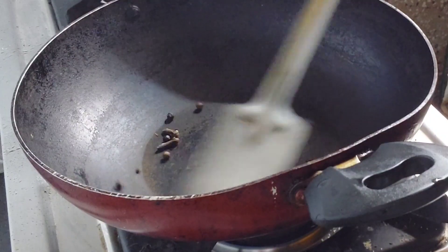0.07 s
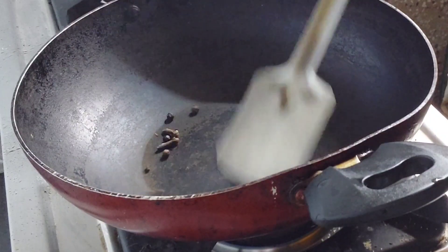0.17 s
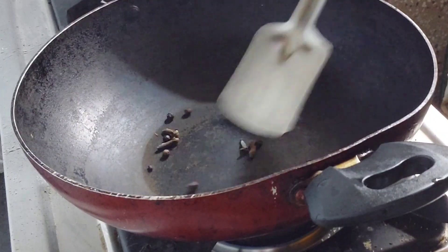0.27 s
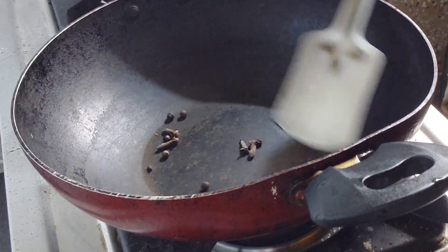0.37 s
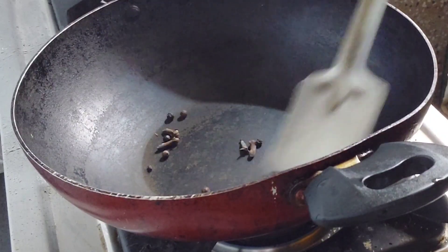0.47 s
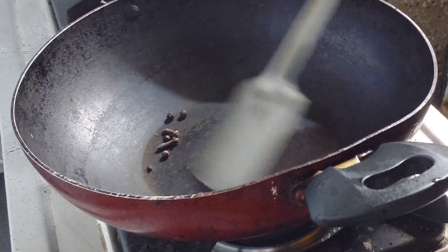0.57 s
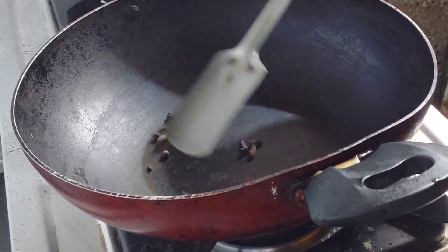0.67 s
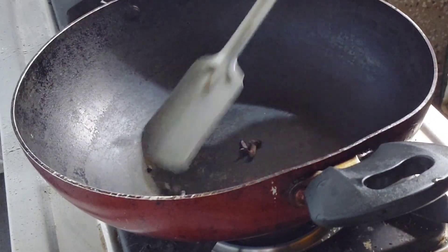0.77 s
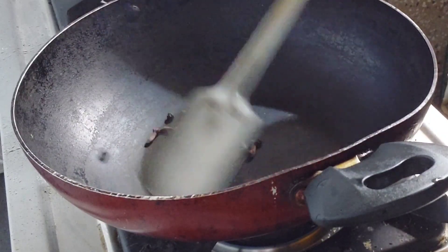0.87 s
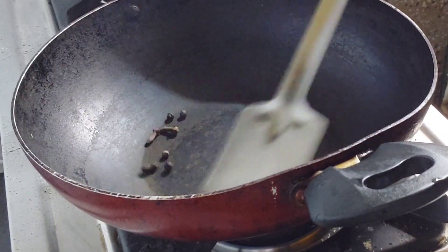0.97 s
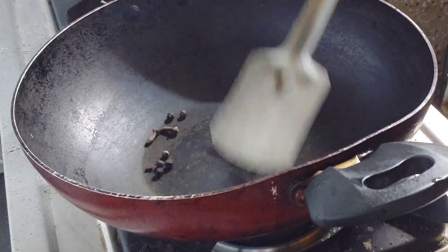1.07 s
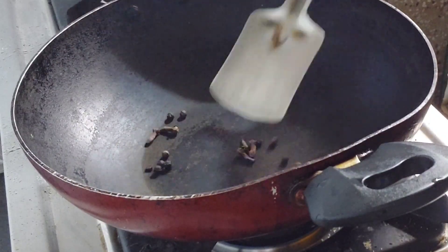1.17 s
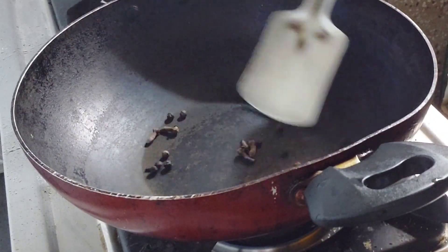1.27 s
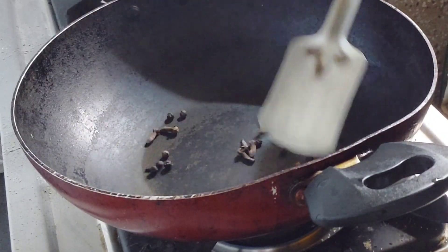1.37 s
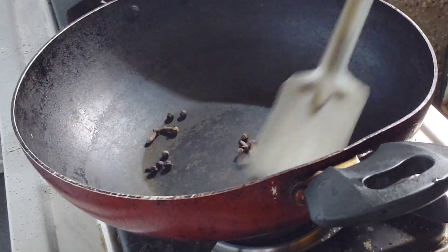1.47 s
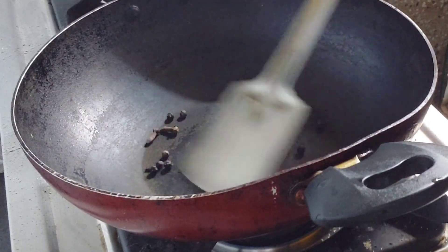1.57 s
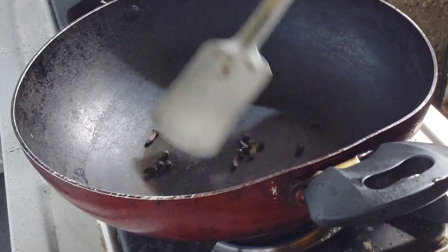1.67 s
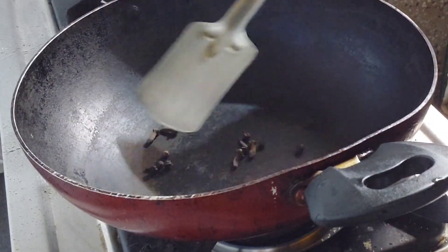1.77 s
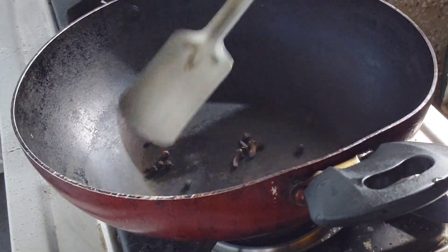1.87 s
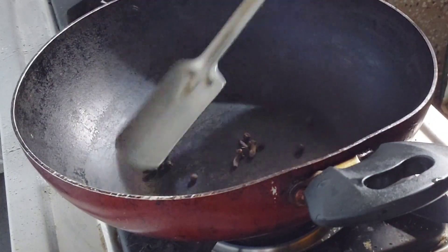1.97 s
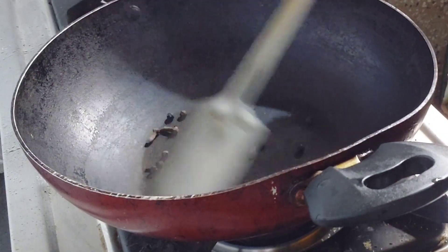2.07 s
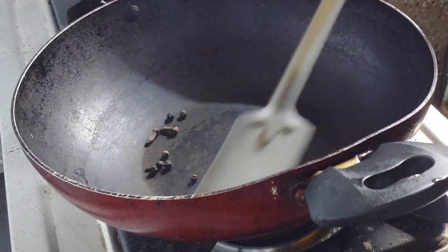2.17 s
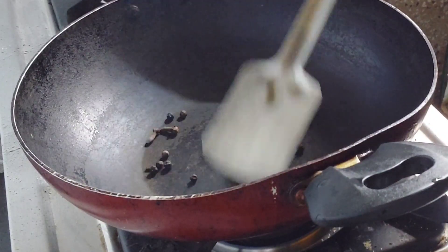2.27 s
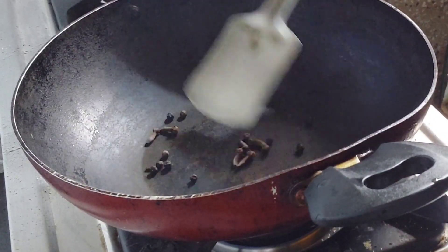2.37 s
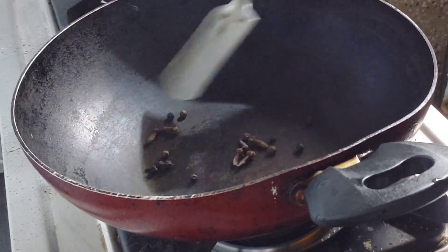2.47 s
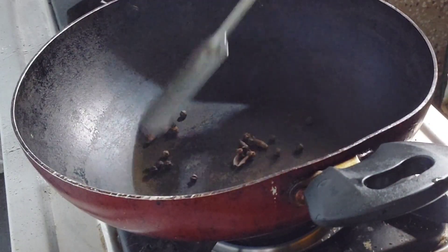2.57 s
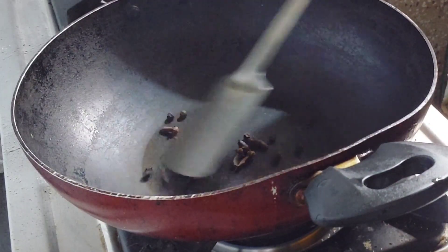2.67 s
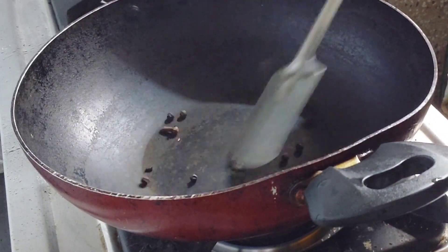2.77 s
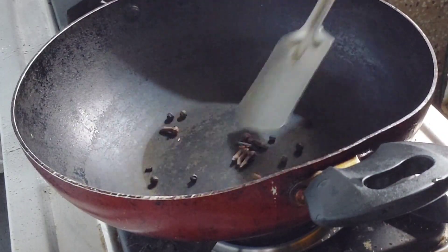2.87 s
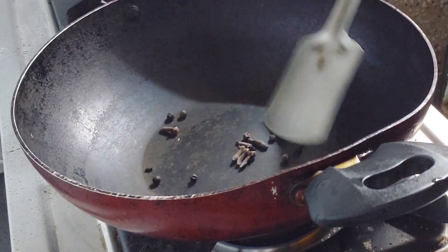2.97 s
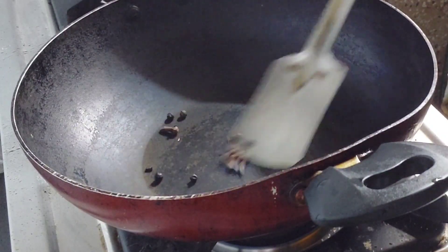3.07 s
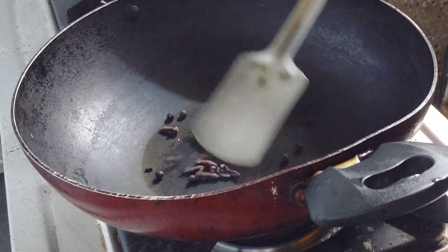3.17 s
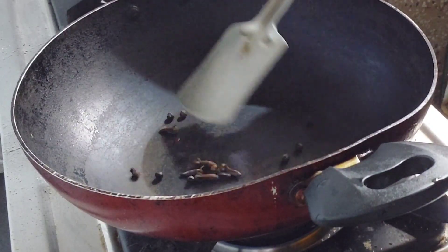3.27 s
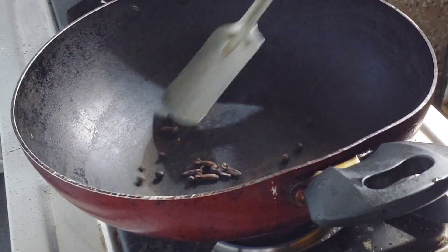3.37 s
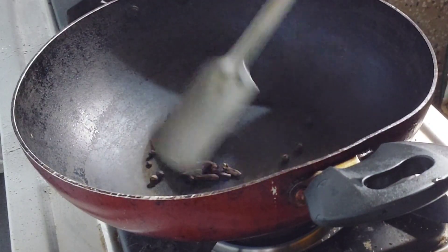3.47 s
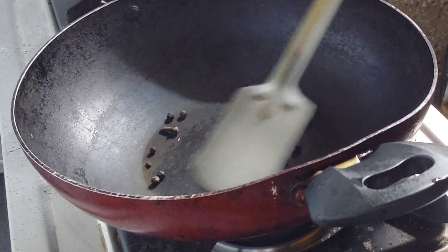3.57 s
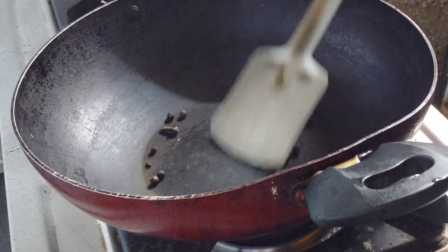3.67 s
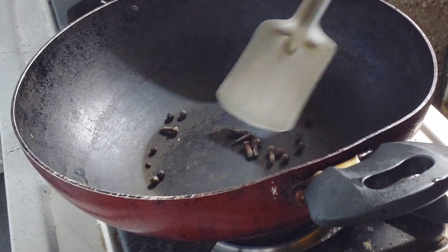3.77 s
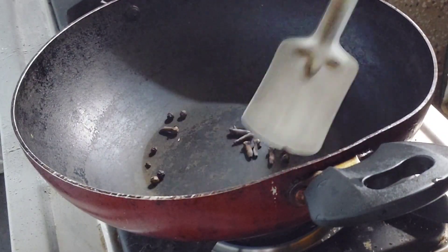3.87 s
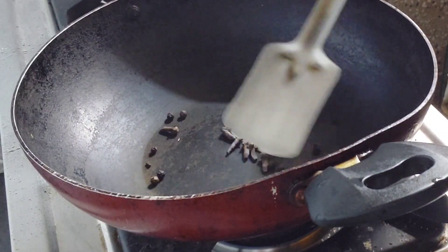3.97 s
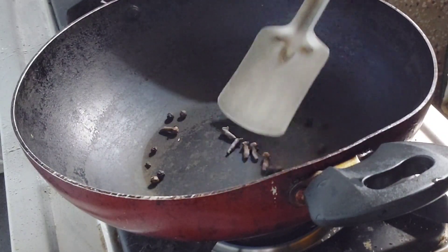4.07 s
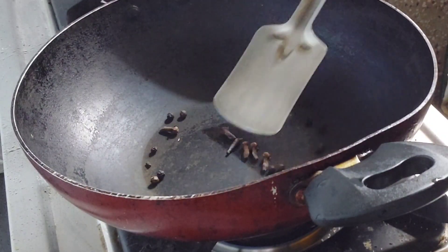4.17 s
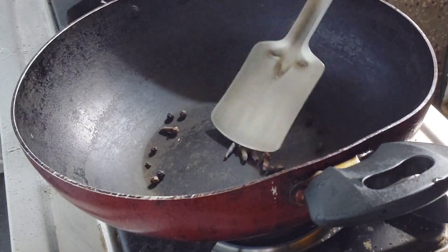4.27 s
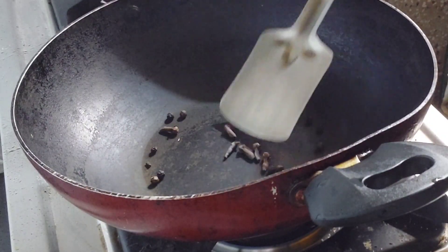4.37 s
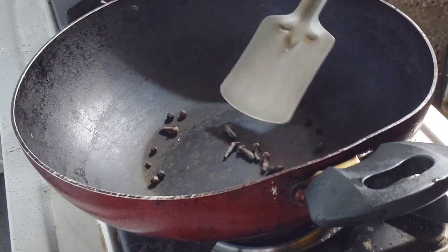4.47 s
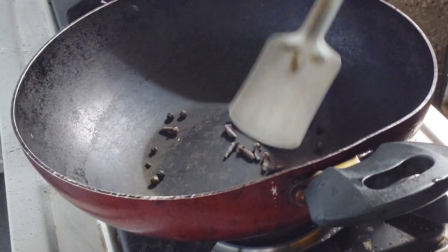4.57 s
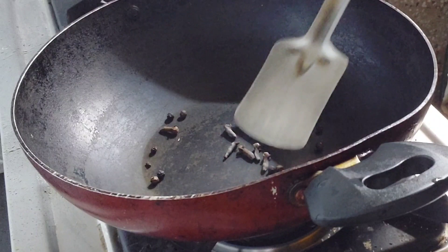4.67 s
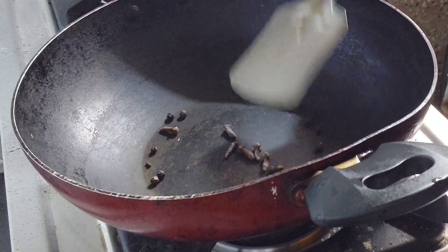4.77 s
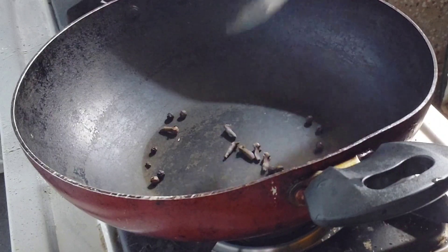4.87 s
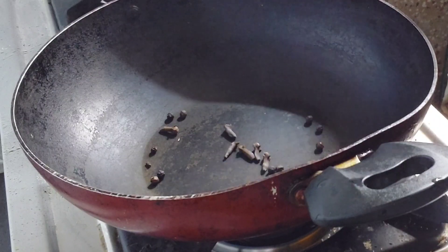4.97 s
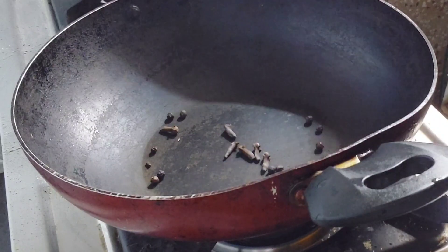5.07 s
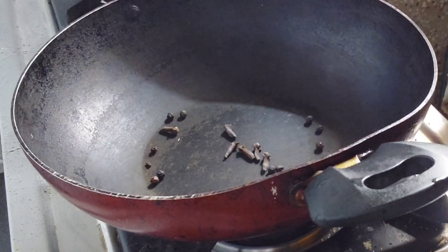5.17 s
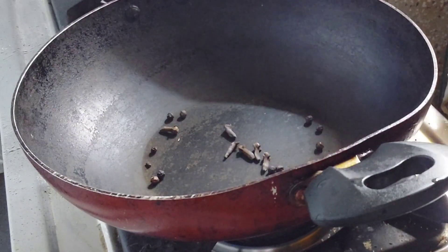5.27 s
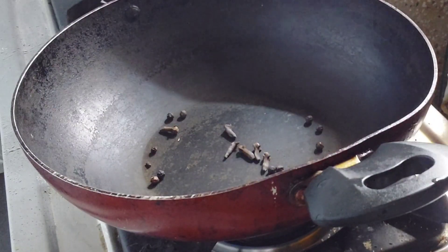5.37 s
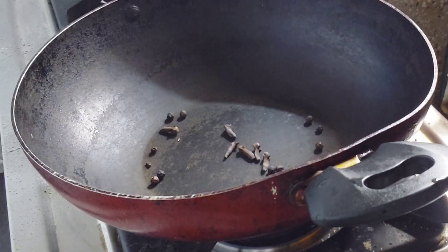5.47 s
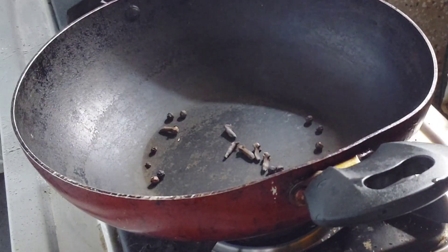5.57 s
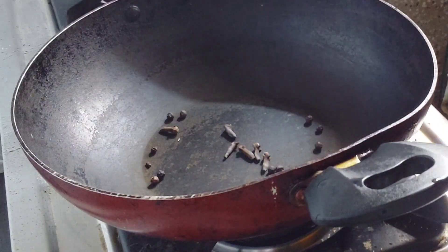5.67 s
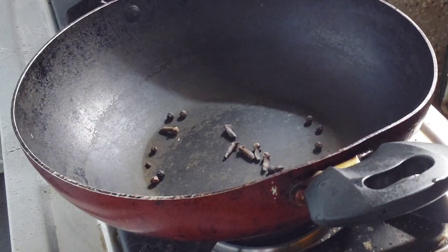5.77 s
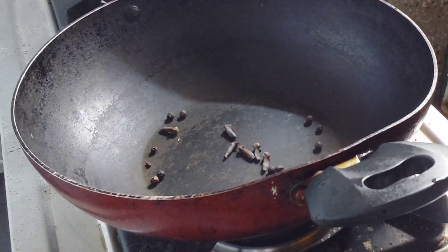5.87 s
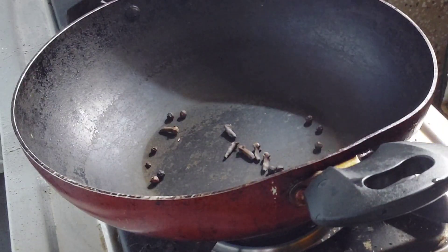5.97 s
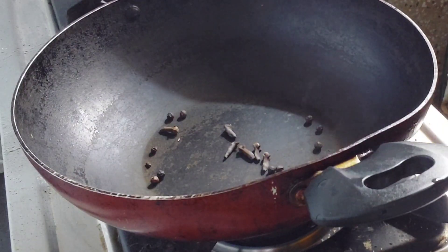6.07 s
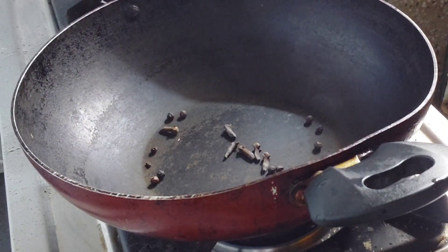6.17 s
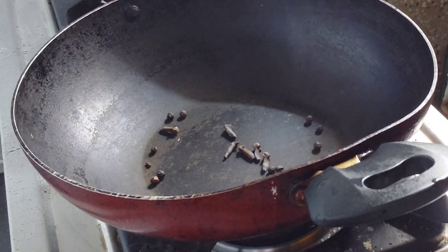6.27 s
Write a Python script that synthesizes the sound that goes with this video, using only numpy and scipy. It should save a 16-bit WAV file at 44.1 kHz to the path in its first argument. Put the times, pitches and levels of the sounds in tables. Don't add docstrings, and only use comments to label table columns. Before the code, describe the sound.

Close stereo sound in a small, quiet kitchen at night. From 0 s a wooden spatula knocks into a thin coated pan and drags whole spices across it with dry, gritty, stick-slip scrapes. Landings come at about 0.0, 0.4, 0.9, 1.4, 2.0, 2.6, 3.1, 3.5, 3.9, 4.3 and 4.7 s; those at 3.1 and 3.9 are sharpest and loudest, while 4.3 is barely a touch. Small spice ticks fall between, notably around 1.1 and 1.6 s. A strong scrape bursts near 2.75 s, leaving a thin high rim ring. Each blow gives a short hollow metallic clank around one kilohertz and a soft low thud from stand and counter. After 4.8 s the stirring stops; only faint low bumps remain until about 6.3 s, over soft night air, a distant throbbing cricket hiss and very high, short katydid rasps that run throughout.

```python
import sys
import numpy as np
from scipy import signal
from scipy.fft import rfft, irfft, next_fast_len
from scipy.io import wavfile

SR = 44100
rng = np.random.default_rng(int(sys.argv[2]) if len(sys.argv) > 2 else 0)


def wav_out(sig):
    wavfile.write(sys.argv[1], SR, np.round(np.clip(np.atleast_2d(sig).T, -1, 1) * 32767).astype(np.int16))


def amplitude_ratio(level_db):
    exponent = np.asarray(level_db, float) / 20
    return 10 ** exponent


N = 279064

# low_hz, high_hz
ZONES_HZ = [(3500, 7500), (330, 750), (750, 1300), (1300, 3500), (7500, 16500)]
# start_s, wall_peak_db, then relative to the wall wood_db, floor_db, side_db
LANDINGS = [(0.0146, -14, -9, -10, -16), (0.4254, -12.5, -18, -4, -9.5), (0.8665, -15.5, -7.5, -5.5, -15.5),
            (1.3823, -14, -16, 3.5, -6.5), (1.9787, -23.5, 1, -0.5, -11), (2.644, -22.5, -2, 3, -10.5),
            (3.0597, -5, -18.5, 0.5, -13.5), (3.5101, -26, -5, -2.5, -14.5), (3.941, -5, -15.5, -1.5, -11),
            (4.3241, -43, -15, 8.5, -36), (4.6654, -18.5, -14.5, 3, -6.5)]
# hz, likeness (0-1)
LIKENESS = [(28, .4), (60, .92), (300, .85), (640, .5), (1400, .05), (15000, .03)]


def rms_one(x):
    return x / np.sqrt(np.mean(x ** 2) + 1e-20)


def at_hz(points, hz):
    points_hz, values = np.transpose(points)
    return np.interp(np.log(hz), np.log(points_hz), values)


def band(x, low_hz, high_hz, order=2):
    sos = signal.butter(order, [low_hz, high_hz], "band", fs=SR, output="sos")
    return signal.sosfilt(sos, x)


def resonance(x, hz, width_hz):
    r = np.exp(-np.pi * width_hz / SR)
    zeros = np.array([1, 0, -1]) * (1 - r * r) / 2
    poles = [1, -2 * r * np.cos(2 * np.pi * hz / SR), r * r]
    return signal.lfilter(zeros, poles, x)


def shape(x, peaks):
    for hz, width_hz, lift_db in peaks:
        x = x + (amplitude_ratio(lift_db) - 1) * resonance(x, hz, width_hz)
    return x


def drift(knots_per_s):
    knots = rng.standard_normal(int(N / SR * 200))
    return np.interp(np.arange(N) / SR * knots_per_s, np.arange(len(knots)), knots)


def banded_noise(size, gain):
    out = 0
    edges_hz = 25 * 2 ** (np.arange(29) / 3)
    white = rng.standard_normal((2, 2, size))
    for k, (low_hz, high_hz) in enumerate(zip(edges_hz, edges_hz[1:])):
        mid, side = band(white[k % 2], low_hz, high_hz)
        hz = np.sqrt(low_hz * high_hz)
        alike = np.clip(at_hz(LIKENESS, hz), -1, 1)
        pair = np.sqrt(1 + alike) * mid + np.sqrt(1 - alike) * side * [[1], [-1]]
        out = out + gain(hz) * pair
    return out


def pan():
    zone_right_db = [-2.5, 3, 2, 2, -2]
    force = friction() + knocks()
    place = 1.3 * drift(14)
    out, size = 0, next_fast_len(N + SR // 2)
    for share in (np.cos(place), np.sin(place)):
        response = pan_response()
        for zone, (low_hz, high_hz), right_db in zip(force, ZONES_HZ, zone_right_db):
            part = band(response, low_hz, high_hz, order=3)
            energy = np.sum(part ** 2, axis=1, keepdims=True)
            part = part / np.sqrt(energy) * amplitude_ratio([[0], [right_db]])
            out = out + rfft(share * zone, size) * rfft(part, size)
    return irfft(out, size)[:, :N]


def pan_response(modes_db=-0.5, room_db=-11.5, port_lag_s=0.0002):
    # hz, level_db, t60_s
    modes_table = [(465, -7, .13), (558, -9, .13), (660, -14, .2), (793, -8, .13), (867, -6, .16),
                   (830, -11, .13), (955, 0, .12), (982, -1, .14), (1068, -4, .13), (1090, -8, .2),
                   (976, -19, .45), (1255, -13, .13), (1555, -8, .14), (1600, -6, .15), (1740, -12, .14),
                   (2010, -11, .16), (2420, -13, .15), (2880, -13, .13), (988, -17, .5), (4409, -14, .12),
                   (4920, -14, .12), (5098, -15, .14), (5490, -15, .16), (5970, -16, .16), (6178, -14, .16),
                   (6331, -18, .16), (7800, -22, .1), (11400, -23, .1), (12150, -24, .1), (15000, -25, .1)]
    # hz, db_per_hz
    shell_db = [(190, -37), (330, -6), (382, -31), (472, -6), (731, -20.5), (964, -15), (1400, -26),
                (1620, -17), (3530, -16), (3710, -16.5), (5130, -14), (6240, -8.5), (8360, -35.5),
                (11800, -7), (16000, -14.5)]
    # hz, t60_s
    shell_t60 = [(330, 0.4), (1000, 0.18), (4000, 0.07), (16000, 0.06)]
    # hz, t60_s
    kitchen_t60 = [(330, 0.17), (1000, 0.44), (4000, 0.41), (16000, 0.1)]
    # hz, width_hz, lift_db
    crowds = [(728, 450, -27), (996, 38, 15.5), (1308.1, 950, 2.5), (1570, 190, 5), (2606, 70, 1.5),
              (3407, 380, -18.5), (4280, 68, -7.5), (5457, 1500, -7), (10174, 2300, -1)]

    t = np.arange(SR // 2) / SR
    swell = 1 - np.exp(-t / 0.00037)
    room_gain = amplitude_ratio(room_db) * (1 - np.exp(-t / 0.0027))

    def shell_gain(hz):
        direct = amplitude_ratio(-60 * t / at_hz(shell_t60, hz))
        late = room_gain * amplitude_ratio(-60 * t / at_hz(kitchen_t60, hz))
        return amplitude_ratio(at_hz(shell_db, hz)) * (direct + late)

    shell = shape(banded_noise(len(t), shell_gain), crowds)
    modes = 0
    chance = rng.uniform(-1, 1, (len(modes_table), 2))
    for (hz, level_db, t60_s), (facing, reach) in zip(modes_table, chance):
        lead = np.pi * hz * port_lag_s + facing * min(hz / 2000, np.pi / 2)
        fade = amplitude_ratio(level_db + 4 * reach - 60 * t / t60_s)
        modes = modes + fade * np.sin(2 * np.pi * hz * t + lead * np.array([[1], [-1]]))
    return swell * (rms_one(shell) + amplitude_ratio(modes_db) * rms_one(modes))


def friction(grains_per_s=2000, spread_db=5.0):
    sizes_db = spread_db * np.minimum(rng.exponential(1, (5, N)), 4)
    sizes = amplitude_ratio(sizes_db) * rng.choice([-1, 1], (5, N))
    grains = rms_one(sizes * (rng.random((5, N)) < grains_per_s / SR))
    chatter_db = np.array([0.75 * drift(70) + 0.5 * drift(190) for zone in ZONES_HZ])
    return amplitude_ratio(pressure() - 6.0 + chatter_db) * grains


def pressure():
    # touch_s, touch_db, lift_s, lift_db, release_db_per_s
    strokes = [(0.03, -33.5, 0.24, -27, 199), (.44, -35.5, 0.57, -21.5, 119.5),
               (0.552, -16.5, .655, -35.5, 403.5), (.88, -30.5, 1.204, -34.5, 131),
               (1.4, -34.5, 1.59, -29, 182), (1.98, -47.5, 2.16, -36, 87),
               (2.165, -39.5, 2.298, -26.5, 173), (2.66, -33.5, 2.772, -31.5, 120),
               (2.739, -24.5, 2.79, -15.5, 300.5), (3.08, -19, 3.207, -34.5, 166),
               (3.53, -41, 3.59, -31, 149), (3.61, -28.5, 3.733, -34.5, 409),
               (3.799, -68, 3.916, -57.5, 321.5), (3.96, -25, 4.03, -29.5, 188),
               (4.33, -53.5, 4.63, -79, 200), (4.685, -23.5, 4.727, -34, 208),
               (5.39, -84, 5.45, -102.5, 200)]
    # wood_db, floor_db, side_db, grit_db
    places = [(0, -7, -3.5, -2.5), (1, 0.5, 0, -5.5), (-8, 10, 3.5, -19), (4, -3.5, -6.5, -5),
              (5, 3.5, 1, -2.5), (17.5, -5, -4, 0.5), (8.5, 1.5, 0, -1.5), (10, 3.5, -2.5, -11),
              (-12, -6, -5, -7), (-7, 4, -5.5, -5), (3.5, -6, -3, -5), (-3, 2, -5, -3.5),
              (-10, -7, -12, -11), (2, 4.5, -3.5, -9.5), (11, 4, -6.5, -15), (5, 5.5, -3, -11),
              (17, 32, 8, -10)]
    # wood_db, floor_db, side_db, grit_db
    sweep_db = [-9, 4.5, 7, -2.7]
    letting_go_db_per_s = [-8.5, -49, -52.5, -5]
    touch_db_per_s = 798
    skid_db, skid_db_per_s, skid_grit_db = -9.5, 888, -10.5

    step = 8
    t = np.arange(0, N, step) / SR
    out = np.full((len(ZONES_HZ), len(t)), -120.)
    for (touch_s, touch_db, lift_s, lift_db, release_db_per_s), place in zip(strokes, places):
        at = round(touch_s * SR / step)
        since = t[at:] - touch_s
        along = np.clip(since / max(lift_s - touch_s, .01), 0, 1)
        after = np.maximum(t[at:] - lift_s, 0)
        wall_db = touch_db + (lift_db - touch_db) * along - release_db_per_s * after
        wall_db = wall_db + np.minimum(touch_db_per_s * since - 10.5, 0)
        parts_db = np.c_[list(place)] + np.c_[sweep_db] * along + np.c_[letting_go_db_per_s] * after
        push_db = wall_db + np.array([0 * along, *parts_db])
        out[:, at:] = np.maximum(out[:, at:], push_db)
    for start_s, wall_db, *parts_db in LANDINGS:
        at = round(start_s * SR / step)
        fading_db = wall_db + skid_db - skid_db_per_s * (t[at:] - start_s)
        zones_db = fading_db + np.c_[[0, *parts_db, skid_grit_db]]
        out[:, at:] = np.maximum(out[:, at:], zones_db)
    return np.repeat(out, step, axis=1)[:, :N]


def knocks(contact_s=0.0003, gain_db=24, lead_s=0.001, flick_wood_db=-17):
    # start_s, wall_peak_db, then relative floor_db, side_db
    flicks = [(0.386, -37, -8, -8), (0.5406, -37, 8, -10), (0.6377, -37.5, 14, 6), (0.707, -29, -10, -19),
              (0.842, -27, -15, -26), (1.025, -22.5, -36, -2), (1.1201, -20.5, 0, -7.5),
              (1.5608, -32.5, 9, -11), (1.6084, -17, 1.5, -6), (1.8507, -44.5, -11, -26),
              (1.9, -46.5, -15.5, -20), (1.9296, -44.5, -29, -18), (2.246, -22.5, -6.5, -20),
              (3.8425, -39.5, -1.5, -11)]
    zone_lift_db = [-2.5, 3.5, 3, 5, -13]
    size = 400
    force = np.zeros((len(ZONES_HZ), N + size))
    hits = list(LANDINGS)
    for start_s, wall_db, floor_db, side_db in flicks:
        hits.append((start_s, wall_db, flick_wood_db, floor_db, side_db))
    fade = np.exp(-np.arange(size) / SR / contact_s)
    bursts = rng.standard_normal((len(hits), size)) * fade
    power = np.abs(rfft(bursts, 2048)) ** 2
    hz = np.arange(1025) * SR / 2048
    zone_power = [power[:, (hz > low) & (hz < high)].mean(axis=1) for low, high in ZONES_HZ]
    weights = np.sqrt(zone_power).T
    for (start_s, wall_db, *parts_db), burst, weight in zip(hits, bursts, weights):
        at = round((start_s - lead_s) * SR)
        level_db = wall_db + gain_db + np.add([0, *parts_db, 0], zone_lift_db)
        force[:, at:at + size] += np.c_[amplitude_ratio(level_db) / weight] * burst
    return force[:, :N]


def rim(hz=3798, t60_s=0.87, feed_s=0.0016):
    # start_s, level_db
    blows = [(0.101, -43), (0.431, -48), (.65, -49.5), (.87, -66.5), (1.149, -50.5), (1.378, -55),
             (1.65, -48.5), (2.004, -56), (2.332, -53.5), (2.818, -30.5), (3.059, -36), (3.698, -57),
             (3.942, -52), (4.33, -69), (4.67, -49), (5.04, -76.5)]
    t, level = np.arange(N) / SR, np.zeros(N)
    for start_s, level_db in blows:
        since = np.maximum(t - start_s, 0)
        level += amplitude_ratio(level_db - 60 * since / t60_s) * (1 - np.exp(-since / feed_s))
    phase = 2 * np.pi * hz * t
    return np.array([np.sin(phase), amplitude_ratio(4.5) * np.sin(phase + 0.24)]) * level


def counter_and_stand():
    # peak_s of the stand (the counter peaks a little later), counter_db, stand_db
    jolt_table = [(0.058, -39, -27.5), (.46, -43, -34), (.28, -49, -36.5), (.58, -43, -34.5),
                  (0.882, -41.5, -33.5), (1.052, -36, -32.5), (1.412, -35.5, -33), (1.828, -52, -48),
                  (2.029, -46, -29.5), (2.12, -44.5, -36.5), (2.289, -44.5, -32), (2.5, -52.5, -45),
                  (2.68, -46, -29), (2.8, -46, -35.5), (3.109, -38.5, -35), (3.32, -46.5, -46),
                  (3.551, -51, -36), (3.68, -47, -36), (3.97, -45, -30), (4.028, -32, -34.5),
                  (4.28, -49, -39), (4.388, -37.5, -36), (4.471, -47, -36.5), (4.71, -36.5, -39.5),
                  (5.15, -57, -52), (5.29, -56, -46.5), (5.45, -62, -48), (5.698, -59, -48.5),
                  (5.88, -56, -49.5), (6.14, -52.5, -57)]
    # hz, width_hz, level_db
    counter_modes = [(83.8, 19, 2.5), (107.5, 20, -4), (136.3, 6.7, -3)]
    # hz, width_hz, level_db
    stand_modes = [(203.1, 15, -4), (227.8, 16, -3), (256, 4.7, -3), (291, 14, 1.5), (324.7, 16, -5)]
    start_s, counter_db, stand_db = np.transpose(jolt_table)
    counter_db = jolt_level(start_s + 0.036, counter_db, rise_db_per_s=146, fall_db_per_s=84)
    stand_db = jolt_level(start_s, stand_db, rise_db_per_s=297.5, fall_db_per_s=79.5)
    counter = shaking(counter_modes, counter_db, alike=.25, right_db=-.5)
    return counter + shaking(stand_modes, stand_db, alike=.2, right_db=4)


def jolt_level(start_s, peaks_db, rise_db_per_s, fall_db_per_s):
    step = 64
    since = np.arange(0, N + step, step) / SR - np.c_[start_s]
    swing_db = np.minimum(rise_db_per_s * since, -fall_db_per_s * since)
    level_db = np.max(np.c_[peaks_db] + swing_db, axis=0)
    return np.interp(np.arange(N) / step, np.arange(len(level_db)), level_db)


def shaking(modes, level_db, alike, right_db):
    mid, side = rng.standard_normal((2, N))
    pair = np.array([mid + alike * side, amplitude_ratio(right_db) * (mid - alike * side)])
    hum = 0
    for hz, width_hz, db in modes:
        hum = hum + amplitude_ratio(db) * resonance(resonance(pair, hz, width_hz), hz, 3 * width_hz)
    return amplitude_ratio(level_db) * hum / np.std(hum.mean(axis=0))


def katydid(level_db=-63, spread_db=3.0, rasp_s=.006, tail_s=.035, tail_db=-9):
    # first_rasp_s, rasp_count, spacing_s
    phrases = [(.03, 10, .075), (.785, 7, .079), (1.381, 3, .076), (1.6997, 2, .068), (1.845, 2, .0765),
               (2.4377, 4, .063), (2.928, 2, .076), (3.3132, 3, .0765), (3.812, 2, .076), (4.1687, 2, .088),
               (4.3218, 4, .0565), (4.6007, 2, .076), (4.7533, 3, .068), (4.9629, 4, .0763),
               (5.2782, 2, .0758), (5.4538, 5, .0755), (5.8334, 2, .0758), (5.991, 2, .075),
               (6.216, 2, .0763)]
    strokes = np.zeros(N)
    rasps = [round((start_s + k * spacing_s) * SR)
             for start_s, count, spacing_s in phrases for k in range(count)]
    strokes[rasps] = amplitude_ratio(level_db + spread_db * rng.standard_normal(len(rasps)))
    pulse = signal.lfilter([1], [1, -np.exp(-1 / (rasp_s * SR))], strokes)
    pulse += amplitude_ratio(tail_db) * signal.lfilter([1], [1, -np.exp(-1 / (tail_s * SR))], strokes)
    hiss = rms_one(band(rng.standard_normal((2, N)), 13000, 16500))
    return amplitude_ratio(-0.5) * pulse * hiss


def crickets(level_db=-69.5, hz=6420, width_hz=550, throb_per_s=7.08, throb_top_s=5.5, depth_db=3.6):
    throb = np.cos(2 * np.pi * throb_per_s * (np.arange(N) / SR - throb_top_s))
    hiss = resonance(rng.standard_normal((2, N)), hz, width_hz)
    hiss = resonance(hiss, hz, 1500)
    hiss = band(hiss, 5500, 7100, order=3)
    return amplitude_ratio(level_db + depth_db * throb + 1.0 * drift(60)) * rms_one(hiss)


def night_air(level_db=-56):
    # hz, db_per_hz
    spectrum = [(25, -16.5), (80, 0.5), (250, -1.5), (380, -16.5), (600, -13.5), (1000, -27.5),
                (1400, -28.5), (2000, -26), (3200, -35), (5200, -41.5), (8600, -46), (12000, -32.5),
                (16000, -36.5)]
    return amplitude_ratio(level_db) * rms_one(banded_noise(N, lambda hz: amplitude_ratio(at_hz(spectrum, hz))))


def scene():
    return pan() + rim() + counter_and_stand() + katydid() + crickets() + night_air()


def low_pass(x):
    return signal.sosfilt(signal.butter(12, 16480, fs=SR, output="sos"), x)


def record(dry):
    # hz, width_hz, lift_db
    left_port = [(1500, 1500, 1.5), (7700, 1000, 5), (11400, 1500, 2)]
    # hz, width_hz, lift_db
    right_port = [(4600, 1200, 2.5), (6250, 900, 15), (9000, 2000, -2), (15200, 2000, 10)]
    out = amplitude_ratio(-3.5) * np.array([shape(dry[0], left_port), shape(dry[1], right_port)])
    out = signal.sosfilt(signal.cheby2(10, 30, 15900, fs=SR, output="sos"), out)
    return low_pass(np.clip(out, -1, 1))


dry = scene()
out = record(dry)
wav_out(out)
```